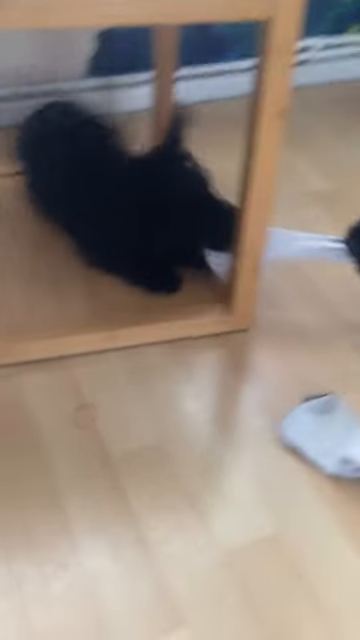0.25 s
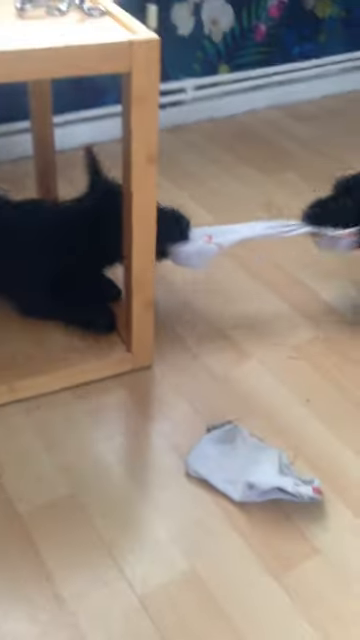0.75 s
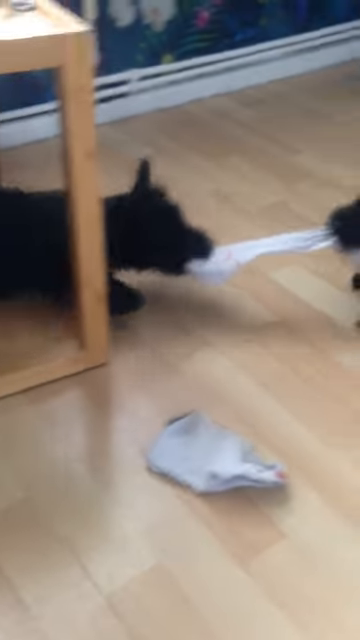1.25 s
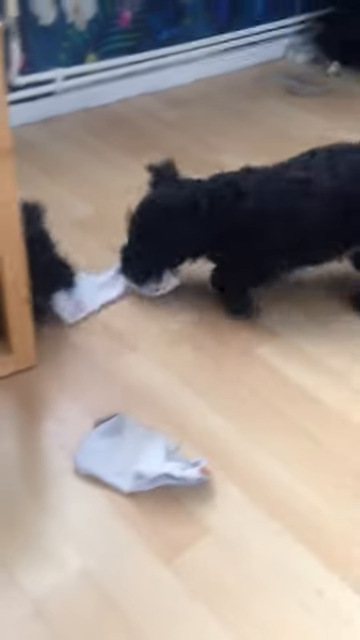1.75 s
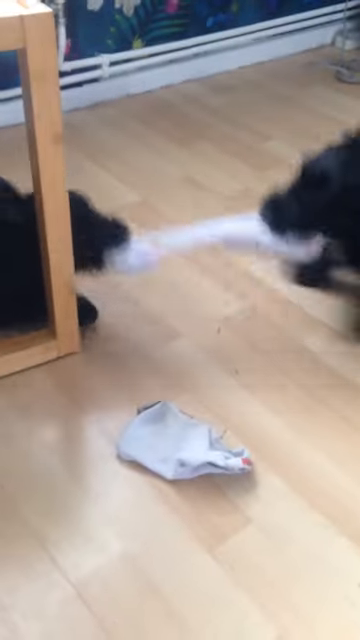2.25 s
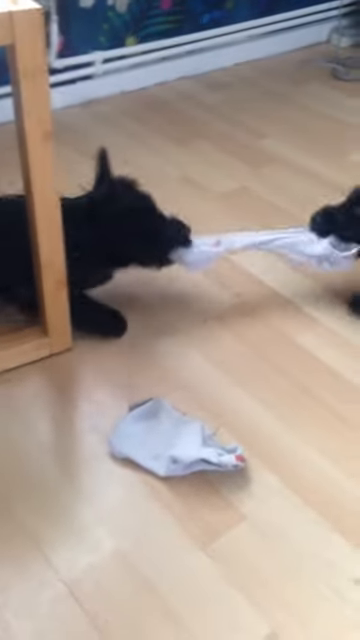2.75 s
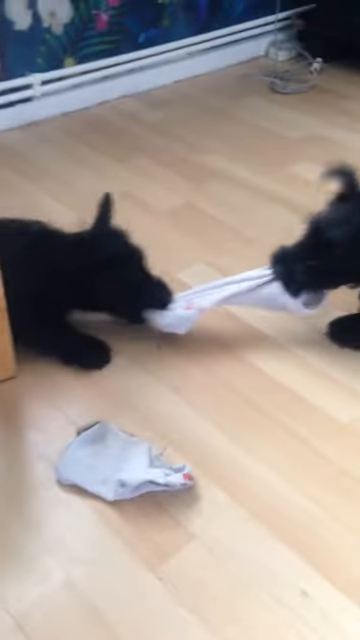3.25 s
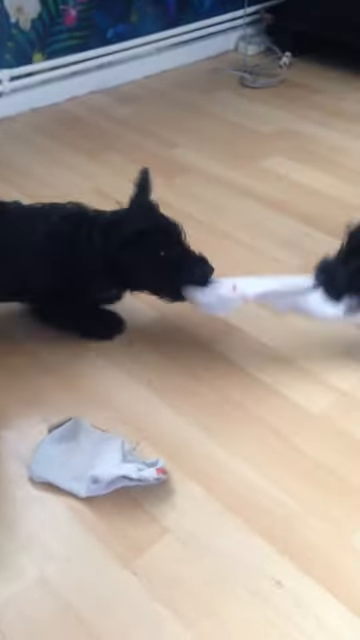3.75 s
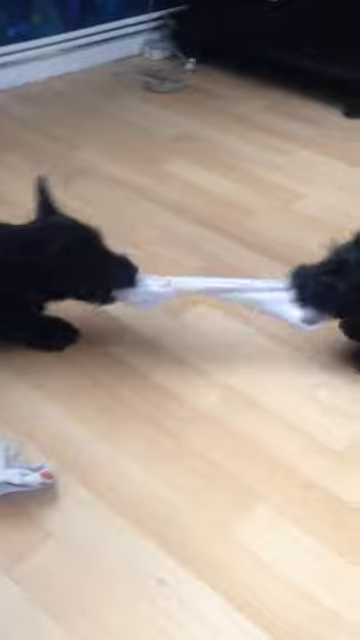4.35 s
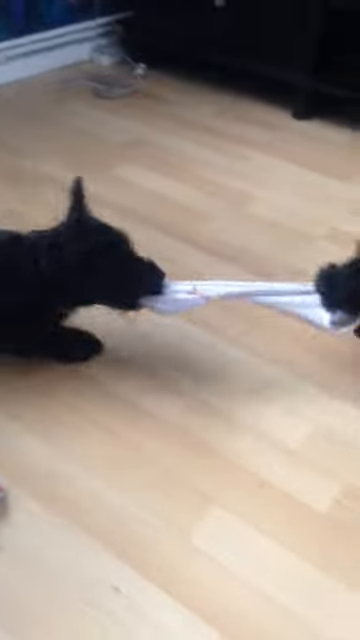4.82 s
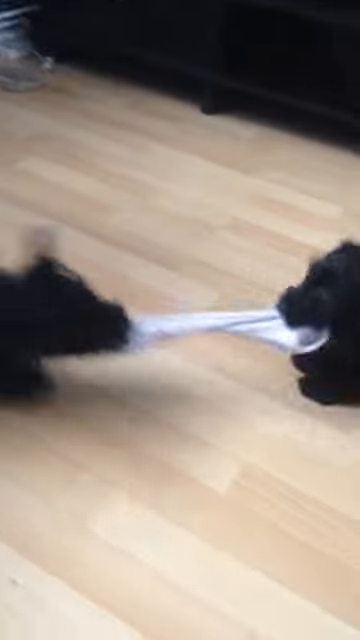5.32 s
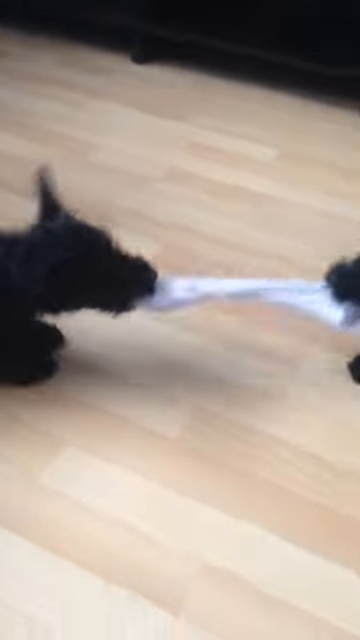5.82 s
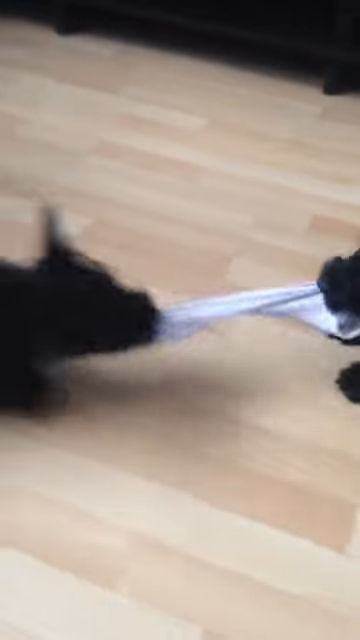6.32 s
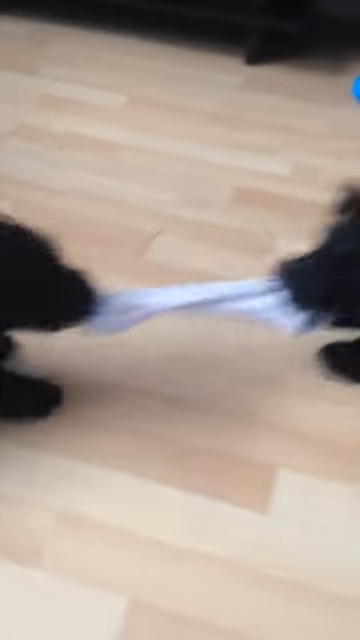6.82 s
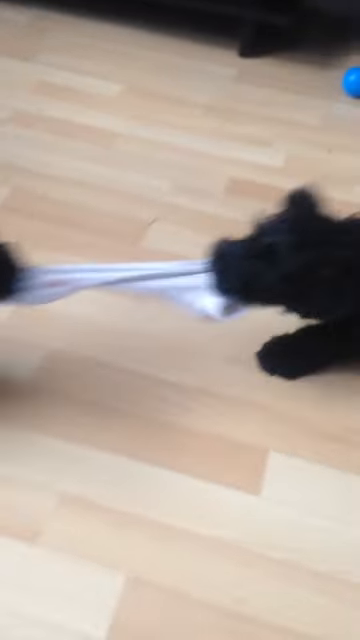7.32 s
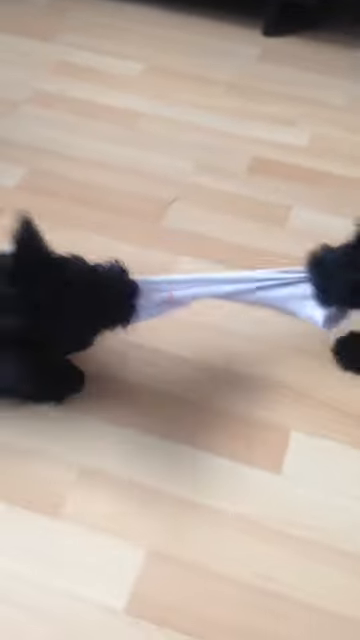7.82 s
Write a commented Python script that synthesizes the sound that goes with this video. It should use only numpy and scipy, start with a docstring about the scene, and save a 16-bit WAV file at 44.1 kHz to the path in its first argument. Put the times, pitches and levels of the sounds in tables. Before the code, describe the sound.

Two small dogs tug at a cloth in a small living room. Their bodies knock sharply against a wooden table frame and the floor several times, over soft rustling of fur and sliding paws. After a quick gritty skid, short growls come through clenched teeth, mixed with claw taps and a few lighter bumps. The room adds a brief echo.

```python
"""Two small dogs growl through clenched teeth as they tug at a cloth: uneven pulses of the vocal
folds excite the resonances of throat, chest and lips. Twice a dog hums or whines faintly.
Their bodies strike a wooden table frame and the laminate floor, which ring in damped modes; claw
taps and hard knocks click sharply. Friction makes paws swish, fur rustle, wood judder and the taut
cloth creak. A small living room reverberates briefly over the low hum of the house."""
import sys
import numpy as np
from scipy import signal
from scipy.fft import rfft, irfft, next_fast_len
from scipy.io import wavfile
from scipy.ndimage import uniform_filter1d, map_coordinates

SR = 44100
rng = np.random.default_rng(int(sys.argv[2]) if len(sys.argv) > 2 else 0)


def wav_record(signal):
    """Record a signal, one row per channel, as 16-bit PCM in the file named by sys.argv[1]."""
    frames = np.transpose(np.atleast_2d(signal))
    bounded = np.clip(frames, -1, 1)
    # unit amplitude maps onto the largest positive 16-bit level
    quanta = np.round(bounded * 32767).astype(np.int16)
    wavfile.write(sys.argv[1], SR, quanta)


N = 355887


def amp(db):
    """Decibels to amplitude ratio."""
    return 10 ** (np.asarray(db) / 20)


def unit(x):
    """Normalise to rms 1."""
    return x / np.sqrt(np.mean(x ** 2) + 1e-20)


def along(points, hz):
    """Interpolate (frequency [Hz], value) points on a logarithmic frequency axis."""
    freqs, values = np.transpose(points)
    return np.interp(np.log(hz + 1), np.log(freqs), values)


def wobble(rate):
    """Smooth random modulation with rate knots a second."""
    knots = rng.standard_normal(int(N * rate / SR) + 4)
    return map_coordinates(knots, [np.arange(N) * rate / SR])


def filtered(x, response):
    """Linear filtering: multiply the spectrum by a frequency response."""
    size = next_fast_len(len(x) + 8192)
    return irfft(rfft(x, size) * response(np.fft.rfftfreq(size, 1 / SR)), size)[:len(x)]


def band(x, lo_hz, hi_hz):
    """Causal Butterworth band-pass."""
    return signal.sosfilt(signal.butter(3, [lo_hz, hi_hz], 'bandpass', fs=SR, output='sos'), x)


def noise(spectrum, size=N):
    """Coloured noise of rms 1 from (frequency [Hz], level [dB]) points."""
    return unit(filtered(rng.standard_normal(size), lambda hz: amp(along(spectrum, hz))))


def add(track, time, sound):
    """Superpose a sound on the track at a time in seconds."""
    start = max(round(time * SR), 0)
    track[start:start + len(sound)] += sound[:N - start]


def contour(start, rise, fall, onset_db=-8, end_db=-20, rise_db_per_s=266, edge_s=0.0019):
    """Amplitude envelope of one tone or growl, and its progress from 0 to 1."""
    t, end = np.arange(N) / SR, start + rise + fall
    rise_db = np.interp(t, [start, start + rise], [max(onset_db, -rise_db_per_s * rise), 0])
    fall_db = end_db * np.clip((t - start - rise) / fall, 0, 1) ** 0.68  # steep, then lingering
    gate = np.interp(t, [start - edge_s, start, end, end + edge_s], [0, 1, 1, 0])
    return gate * amp(rise_db + fall_db), np.clip((t - start) / (end - start), 0, 1)


def rings_and_whines(overtone_db=-6, db_per_octave=-22):
    """Nearly periodic vibration: ringing wood and a dog's faint voice give thin, wavering tones."""
    # wood rings near 415 Hz and dies away at the start; rubbed wood judders briefly at 3.49 s;
    # a dog hums at 0.36 s and whines at 6.94 s:
    # (start [s], rise [s], fall [s], level [dB], first pitch [Hz], last pitch [Hz], waver [ratio])
    tones = [(0, 0.0027, 0.056, -36, 457, 413, 0.069), (.04, 0.043, 0.092, -58.5, 414, 411, 0.052),
             (.36, 0.33, 0.097, -64, 141.4, 116, 0.044), (3.49, 0.04, 0.05, -56, 771, 786, 0.0088),
             (6.94, 0.31, 0.052, -57.5, 221.5, 293, .22)]
    out = np.zeros(N)
    for start, rise, fall, db, first_hz, last_hz, waver in tones:
        envelope, progress = contour(start, rise, fall)
        pitch = first_hz * (last_hz / first_hz) ** progress
        phase = 2 * np.pi * np.cumsum(pitch * (1 + waver * wobble(110))) / SR
        overtone = amp(overtone_db + db_per_octave * np.abs(np.log2(pitch / 250)))
        out += envelope * amp(db) * (np.sin(phase) + overtone * np.sin(2 * phase))
    return out


def swell(t, rise, fall):
    """A nearly Gaussian envelope: 1 at t = 0, 1/e at -rise and at fall."""
    return np.exp(-np.abs(t / np.where(t < 0, rise, fall)) ** 1.84)


def rubbing_gains(hiss_offset_db=-3, rub_offset_db=-1.5, rub_follow=0.59, usual_db=-68):
    """Incoherent sources add in power: strokes over a slowly varying drag set rustle, hiss and rub."""
    # cloth and fur under the pull: (time [s], level [dB])
    drag = [(0, -65.5), (.45, -61.5), (.82, -71.5), (1.1, -74), (1.43, -62.5), (1.58, -73.5), (2.07, -71),
            (2.65, -83), (2.95, -62), (3.12, -69), (3.42, -79.5), (3.6, -66.5), (4.0, -69), (4.4, -62.5),
            (4.72, -69.5), (4.95, -65.5), (6.2, -66), (8.07, -66)]
    # a paw or flank sweeps the floor:
    # (peak time [s], level [dB], rise [s], fall [s], relative hiss [dB], relative rub [dB])
    strokes = [(0.656, -53, 0.085, 0.095, -6, -35), (.885, -61, 0.051, 0.016, 4.5, -8),
               (.99, -56.5, 0.068, 0.11, -1.5, -3), (1.245, -57, 0.15, 0.062, -3, -2),
               (1.315, -55, 0.028, 0.051, -21, 1.5), (1.78, -59.5, 0.078, 0.099, -3.5, -2),
               (1.94, -58, 0.038, 0.081, -17, 1), (2.134, -57, 0.038, 0.071, -2.5, -6.5),
               (2.265, -57.5, 0.07, 0.036, -1, -9.5), (2.44, -60, 0.17, 0.35, -2, -0.5),
               (2.765, -50.5, 0.061, 0.093, -10, -8.5), (3.02, -61, 0.066, 0.055, -15, -10),
               (3.205, -55.5, 0.035, 0.074, -15, -6), (3.54, -60.5, 0.08, 0.042, -7, -1.5),
               (3.81, -53, 0.083, 0.085, -0.5, -10), (4.09, -62.5, 0.046, 0.048, -4, -12),
               (4.209, -55.5, 0.071, 0.079, -13, -15), (4.59, -60.5, 0.09, 0.054, 4, -4),
               (5.36, -59.5, 0.058, 0.27, -1, -8), (5.55, -60.5, 0.035, 0.042, 0.5, 1),
               (5.681, -56, 0.08, 0.069, -0.5, -11), (6.285, -64, 0.19, 0.11, 7, -25),
               (6.5, -60.5, 0.066, 0.18, -1.5, -10), (6.784, -55.5, 0.011, 0.034, -7, -6.5),
               (6.91, -67.5, 0.032, 0.063, -15, 3.5), (7.105, -60, 0.017, 0.032, -10, -0.5),
               (7.385, -67.5, 0.043, 0.032, 7, -13), (7.48, -59.5, 0.025, 0.12, 1.5, -3.5),
               (7.971, -52.5, 0.042, 0.082, -5, -20)]
    drag_db = np.interp(np.arange(N) / SR, *np.transpose(drag))
    boards_db = usual_db + rub_follow * (drag_db - usual_db)
    power = amp([drag_db, drag_db + hiss_offset_db, boards_db + rub_offset_db]) ** 2
    t = np.arange(-SR // 2, SR // 2) / SR
    for time, db, rise, fall, hiss_db, rub_db in strokes:
        sweep = swell(t, rise, fall)
        for layer, layer_db in zip(power, [0, hiss_db, rub_db]):
            add(layer, time + t[0], (amp(db + layer_db) * sweep) ** 2)
    return np.sqrt(power)


def patchy(x, depth_db):
    """Random gain over time and frequency: the spectrum shifts as the contact moves."""
    spectra = signal.stft(x, nperseg=512)[2]
    field = uniform_filter1d(rng.standard_normal(spectra.shape), size=9, axis=0)
    field = unit(uniform_filter1d(field, size=12, axis=1))
    return unit(signal.istft(spectra * amp(depth_db * field), nperseg=512)[1][:N])


def scuffle():
    """Sliding friction: fur, cloth and pads move in tiny slips, over the dull rub of the boards."""
    # spectra of cloth rustle, fur hiss and board rub: (frequency [Hz], level [dB])
    cloth = [(900, -18.5), (2000, -5), (3000, -2), (4300, -0.5), (7500, -5), (10000, -10), (15000, -40.5)]
    fur = [(4000, -7), (7500, -2), (10000, -2.5), (13000, -3.5), (15500, -17.5)]
    boards = [(100, -33.5), (250, -4.5), (500, 3.5), (750, 2), (1200, -1.5), (1800, -3), (3200, -16.5)]
    rustle_gain, hiss_gain, rub_gain = rubbing_gains()
    slips = unit(amp(0.5 * wobble(700) + 1.52 * wobble(45)))
    rustle = rustle_gain * patchy(noise(cloth), depth_db=2.46)
    hiss = hiss_gain * patchy(noise(fur), depth_db=-1.0)
    rub = rub_gain * amp(2.3 * wobble(30)) * patchy(noise(boards), depth_db=2.5)
    return amp(-1.5) * slips * (rustle + hiss) + rub


def skids(grain_db=2):
    """Static friction gives way: a sliding paw makes a gritty swish that swells and dies."""
    # (peak time [s], level [dB], rise [s], fall [s], treble tilt [dB/octave])
    slips = [(0.068, -55, 0.015, 0.018, 2), (.215, -54, 0.011, 0.043, -3.5),
             (3.368, -57.5, 0.011, 0.0071, 2.5), (3.773, -33, 0.0089, 0.019, -0.5),
             (3.915, -51, 0.013, 0.007, -1), (4.759, -57, 0.0058, 0.0058, -7.5),
             (4.95, -49, 0.034, 0.012, -6), (7.972, -44.5, 0.025, 0.014, 15)]
    # spectrum of the slide: (frequency [Hz], level [dB])
    slide = [(410, -45), (700, -13), (828, -29), (1050, -24), (1480, -10), (3360, -4.5), (3770, 2),
             (5080, 1.5), (12000, -5.5), (15500, -19.5)]
    out, t = np.zeros(N), np.arange(N) / SR
    grit = noise(slide) * amp(grain_db * wobble(900))
    for time, db, rise, fall, tilt in slips:
        envelope = np.exp(np.minimum((t - time) / rise, (time - t) / fall))
        swish = unit(filtered(grit, lambda hz: amp(tilt * np.log2(hz / 5000 + 0.39))))
        out += amp(db) * envelope * swish
    return out


def focus(hz, centre_hz, loss_db):
    """Spectral weighting in dB: a parabola in octaves, loss_db down one octave from the centre."""
    return -loss_db * np.log2(hz / centre_hz) ** 2


def burst(spectrum, t, t60):
    """Dense modes struck at once act as exponentially decaying noise; t60 sets its energy."""
    decay = amp(-60 * t / t60)
    return unit(noise(spectrum, size=len(t)) * decay) * np.sqrt(np.mean(decay ** 2))


def bumps(ring_db=-13, ring_growth=0.2, attack_s=0.00066):
    """Impact excites damped modes of wood: heavy blows ring more, hard ones add edge and crack."""
    # bodies and paws on wood:
    # (time [s], level [dB], knock centre [Hz], thud [dB], edge [dB], crack [dB])
    blows = [(0.229, -37, 250, 2, -29, -22), (0.238, -21, 516, -10.5, -11, -13),
             (0.267, -13, 445, -33, -9, -25), (0.271, -7.5, 514, -21.5, -10, -24.5),
             (0.887, -24.5, 370, -1.5, -13, -20), (0.893, -24.5, 484, -10, -7.5, -8),
             (0.9, -22, 610, -28, -25, -11), (1.72, -30, 330, -4.5, -9, -41),
             (1.734, -31, 290, -14, -30, -37), (1.77, -32, 500, -14, -4, -12),
             (1.907, -43.5, 607, -30, 5.5, 5), (2.284, -22.5, 355, -7, -25, -34),
             (2.2903, -13.5, 820, -17.5, -14, -13), (2.321, -26, 620, -15, -6, -15),
             (2.81, -47.5, 820, -2, 7, -22), (4.10, -51, 220, 8.5, -14, -10),
             (6.281, -43, 750, -9, -11, -9), (7.173, -38, 588, -18, -14, -27),
             (7.549, -41.5, 595.6, -29, -20, -18), (7.876, -42, 425, -22, -8, -18),
             (7.948, -33.5, 325, -3, -26, -13)]
    # low modes of frame and boards: (frequency [Hz], level [dB], t60 [s])
    wood_modes = [(320, -12, 0.11), (379, -4, 0.19), (419.3, -1, 0.18), (476, -4.5, 0.13),
                  (527, -11.5, 0.13), (567, -3.5, 0.072), (657, -2, .1), (717, 1, 0.088), (813, -16, 0.08)]
    # spectra of a blow's parts: (frequency [Hz], level [dB])
    knock = [(150, -29), (330, 15), (740, 9.5), (1100, -12), (3000, -59)]  # heavily damped part
    thud = [(25, -32), (60, -31), (120, 0.5), (220, -1), (400, -7), (1200, -50)]  # floor
    edge = [(500, -13), (850, -14), (1080, 9.5), (1300, -6), (1750, -1), (2200, -15), (3000, -29.5),
            (6000, -21)]  # dense upper modes
    crack = [(1200, 0), (2250, -3.5), (3300, -9), (5500, -15), (15000, -49)]  # hard contact
    out, t = np.zeros(N), np.arange(SR // 3) / SR
    for time, db, centre_hz, thud_db, edge_db, crack_db in blows:
        ring = np.zeros(len(t))
        for hz, level, t60 in wood_modes:
            mode_db = level + focus(hz, centre_hz, loss_db=18) + rng.normal(0, 1)
            ring += amp(mode_db - 60 * t / t60) * np.sin(2 * np.pi * (hz * t + rng.random()))
        colour = [(hz, level + focus(hz, centre_hz, loss_db=7)) for hz, level in knock]
        blow = amp(ring_db + ring_growth * db) * ring
        blow += amp(-10.5) * burst(colour, t, t60=0.029)
        blow += amp(thud_db - 7) * burst(thud, t, t60=0.098)
        blow += amp(edge_db - 7) * burst(edge, t, t60=0.053)
        blow += amp(crack_db - 9) * burst(crack, t, t60=0.051)
        add(out, time, amp(db) * blow * (1 - np.exp(-t / attack_s)))
    return band(out, 67, 15000)  # light boards radiate no deep bass


def landings(attack_s=0.002):
    """Free vibration of a plate: the floor gives under a dog's weight and booms briefly."""
    # a dog comes down: (time [s], level [dB])
    impacts = [(.272, -41), (.889, -43.5), (2.29, -36)]
    # deep modes of the floor: (frequency [Hz], level [dB], t60 [s])
    floor_modes = [(103, -4.5, 0.15), (128.4, 0, .15)]
    out, t = np.zeros(N), np.arange(SR // 3) / SR
    boom = sum(amp(db - 60 * t / t60) * np.sin(2 * np.pi * hz * t) for hz, db, t60 in floor_modes)
    for time, db in impacts:
        add(out, time, amp(db) * boom * (1 - np.exp(-t / attack_s)))
    return out


def clicks(snap_db=-3, tail_db=-23):
    """A short contact has a broad spectrum: claw taps and the bright crack of hard knocks on wood."""
    # knocks in the first second, claws after: (time [s], level [dB], centre of emphasis [Hz])
    contacts = [(0.2726, -20, 5030), (0.275, -20.5, 6000), (0.2775, -34, 6000), (0.901, -46, 5000),
                (1.162, -38.5, 4440), (1.906, -40.5, 6000), (1.957, -40, 8100), (2.411, -41, 6810),
                (3.446, -50, 2560), (3.715, -46, 7560), (4.1696, -29.5, 7000), (4.9467, -33, 6700),
                (5.0538, -38.5, 9490), (5.278, -48.5, 6260), (5.303, -47, 6600), (5.331, -45, 6600),
                (5.6321, -35.5, 9800), (6.115, -41, 8470), (6.268, -41, 12530), (6.444, -42.5, 9000),
                (6.485, -41, 2799), (6.696, -61, 6660), (6.71, -46, 10520), (6.776, -49.5, 3960),
                (6.890, -41, 7500), (7.0884, -40.5, 9800), (7.103, -45, 9000), (7.135, -49, 6650),
                (7.271, -52, 10500), (7.456, -35, 6600), (7.47, -51, 9000), (7.483, -42, 9000),
                (7.862, -43.5, 10600), (7.933, -45, 12500)]
    # spectrum of a click: (frequency [Hz], level [dB])
    spectrum = [(600, -14), (1500, 5), (4500, -3), (7000, -1), (11000, -1.5), (15500, -3)]
    out, t = np.zeros(N), np.arange(SR // 6) / SR
    for time, db, centre_hz in contacts:
        colour = [(hz, level + focus(hz, centre_hz, loss_db=4.5)) for hz, level in spectrum]
        snap = amp(snap_db) * burst(colour, t, t60=0.016)
        tail = amp(tail_db) * burst(colour, t, t60=0.094)
        add(out, time, amp(db) * (snap + tail))
    return out


def larynx(pitch, rough, jitter=0.34, shimmer_db=7):
    """Glottal source: vocal folds slap unevenly in time and strength; each opening puffs air."""
    size = len(pitch)
    cycles = np.cumsum(pitch * np.exp(jitter * rough * wobble(130)[:size])) / SR
    beats = np.flatnonzero(np.diff(np.floor(cycles), prepend=-1))
    strengths = amp(shimmer_db * rough * rng.standard_normal(len(beats)))
    # a strong pulse uses up its neighbours' air
    strengths /= np.sqrt(uniform_filter1d(strengths ** 2, size=5))
    pulses = np.zeros(size)
    pulses[beats] = strengths * np.sqrt(SR / pitch[beats])
    air = unit(rng.standard_normal(size) * np.exp(-3 * (cycles % 1)))
    return pulses, air


def tract(x, formants, lo_hz, hi_hz):
    """Formant filter: parallel resonators of alternating sign, with a unit-energy impulse response."""
    hz = np.fft.rfftfreq(4096, 1 / SR)
    response = sum((-1) ** k * amp(db) * 1j * hz * width / (centre ** 2 - hz ** 2 + 1j * hz * width)
                   for k, (centre, width, db) in enumerate(formants))
    ring = band(irfft(response), lo_hz, hi_hz)
    return signal.fftconvolve(x, ring / np.linalg.norm(ring))[:len(x)]


def growls(slack_hz=92.84, chest_growth_db=1, rasp=0.55, hoarse=0.88):
    """Source and filter: pulses ring throat and chest; the lips snarl most at the hardest push."""
    # (start [s], rise [s], fall [s], level [dB], first pulse rate [Hz], roughness [0-1],
    #  chest tone [dB], mouth opening [0-1], snarl [dB])
    calls = [(3.126, 0.013, 0.024, -50, 186, 0.34, -4, 0.52, -15.5),
             (3.47, 0.052, 0.069, -55.5, 111, 0.79, -5.5, 0.78, -14.5),
             (3.68, 0.058, 0.089, -54.5, 109, 0.61, -7, 0.55, -16),
             (4.509, 0.057, 0.073, -40, 130, 0.48, -10.5, 0.58, -17.5),
             (4.847, .045, 0.098, -31, 159.9, 0.6, -7.5, 0.26, -16.5),
             (5.021, .004, 0.044, -45, 99.5, 0.57, -3, 0.1, -21),
             (5.069, 0.109, 0.03, -44, 100.7, 0.28, 0, 0.22, -21),
             (5.412, 0.023, 0.072, -30, 177.2, .35, -4.5, 0.09, -19),
             (5.951, 0.0134, 0.1, -35.5, 140.5, 0.47, -3, 0.06, -23.5),
             (6.436, 0.02, 0.13, -40.5, 112.8, 0.58, -4, 0.15, -18.5),
             (7.46, 0.071, 0.072, -56.5, 89.3, 0.91, -2.5, 0, -6.5),
             (7.77, 0.11, 0.11, -57, 86.8, 0.76, 7.5, 0, -17)]
    # formants: (frequency [Hz], bandwidth [Hz], level [dB])
    clenched_throat = [(284.3, 55, 1.5), (437, 115, 6), (570, 137, -3.5)]
    open_throat = [(460, 58, 3), (612, 150, -6.5), (770, 19, -7)]
    chest = [(108, 27, -25), (211, 64, 8)]
    lips = [(1036, 214, 6.5), (1390, 116, 0.5), (1940, 116, -9.5), (3310, 160, -4)]
    out = np.zeros(N)
    for start, rise, fall, db, first_hz, rough, chest_db, mouth, snarl_db in calls:
        push, progress = (curve[round(start * SR):][:SR // 3] for curve in contour(start, rise, fall))
        pitch = first_hz * (slack_hz / first_hz) ** progress  # the folds relax as the push runs out
        pulses, air = larynx(pitch, rough)
        source = push * (pulses + rasp * rough * air)
        throat = np.sqrt(1 - mouth) * tract(source, clenched_throat, 233, 720)
        throat += np.sqrt(mouth) * tract(source, open_throat, 281, 886)
        chest_gain = amp(chest_db + chest_growth_db * (progress - 1))
        voice = (throat + chest_gain * tract(source, chest, 77, 238)) / np.hypot(1, chest_gain)
        snarl = tract(push ** 1.16 * (pulses + hoarse * air), lips, 537, 3700)
        add(out, start, amp(db) * (voice + amp(snarl_db - 2) * snarl))
    return out


def creaks(grain_db=4):
    """Stick-slip friction: threads of the taut cloth slip over each other in a faint dry rasp."""
    # (peak time [s], level [dB], rise [s], fall [s])
    pulls = [(4.36, -71, 0.13, 0.1), (6.03, -66.5, 0.2, 0.15), (6.98, -67, 0.06, 0.043),
             (7.22, -69, 0.11, 0.4)]
    # spectrum of the rasp: (frequency [Hz], level [dB])
    weave = [(700, -17), (1150, 0), (1600, 5), (1950, 4), (2500, -33)]
    t = np.arange(N) / SR
    strain = sum(amp(db) * swell(t - time, rise, fall) for time, db, rise, fall in pulls)
    return strain * unit(noise(weave) * amp(grain_db * wobble(150)))


def room(x, gap_s=0.005):
    """Reverberation: reflections follow a short gap, each frequency decaying at its own rate."""
    # reverberation time: (frequency [Hz], t60 [s])
    decay_times = [(100, 0.36), (450, 0.32), (1500, 0.38), (5000, 0.25), (14000, 0.2)]
    hz, t, spectra = signal.stft(rng.standard_normal(SR // 2), SR, nperseg=256)
    decay = amp(-60 * t / along(decay_times, hz)[:, None])
    tail = signal.istft(spectra * decay, SR, nperseg=256)[1]
    tail = np.pad(tail / np.linalg.norm(tail), (round(gap_s * SR), 0))
    return signal.fftconvolve(x, tail)[:N]


def scene():
    """Superposition of the sources, their reverberation and a low background, in mono."""
    # background noise of the house: (frequency [Hz], level [dB])
    hum = [(20, -22), (50, -3.5), (100, 5), (160, -1.5), (400, -8), (1500, -14.5), (8000, -27.5)]
    pitched = rings_and_whines() + growls()
    blows = bumps() + landings()
    bright = skids() + clicks()
    reverb = room(amp(-6.5) * (pitched + blows) + amp(-4) * bright)
    return (pitched + blows + bright + reverb + scuffle() + creaks() + amp(-71) * noise(hum))[None]


def record(dry, top_hz=15480):
    """Band limiting: an ideal low-pass removes everything above top_hz."""
    return np.array([filtered(x, lambda hz: hz < top_hz) for x in dry])


dry = scene()
out = record(dry)
wav_record(out)
```